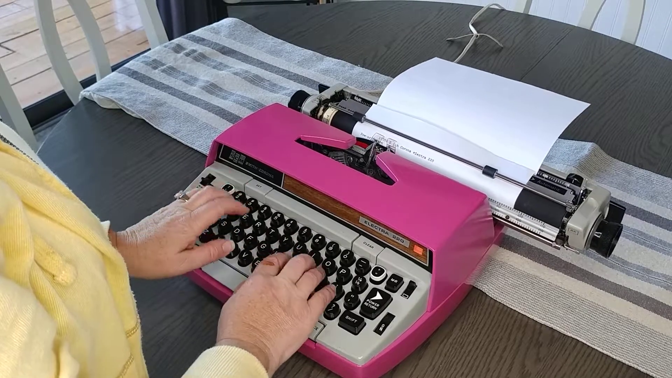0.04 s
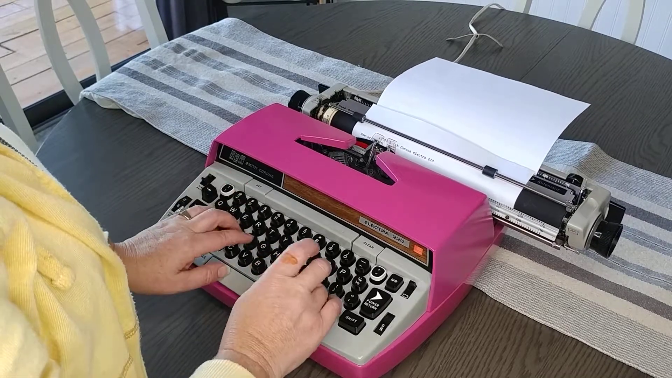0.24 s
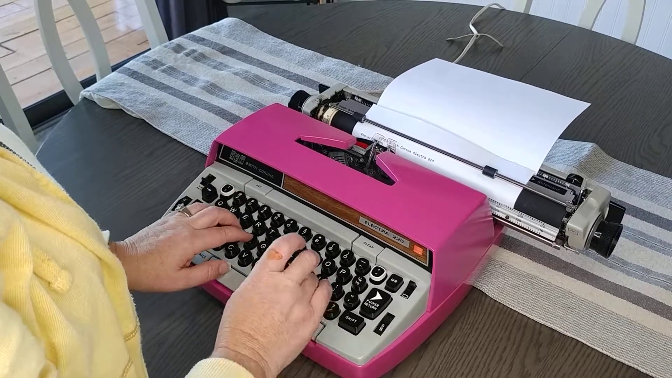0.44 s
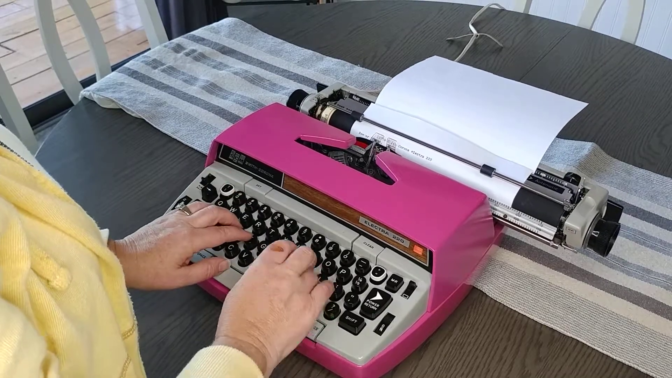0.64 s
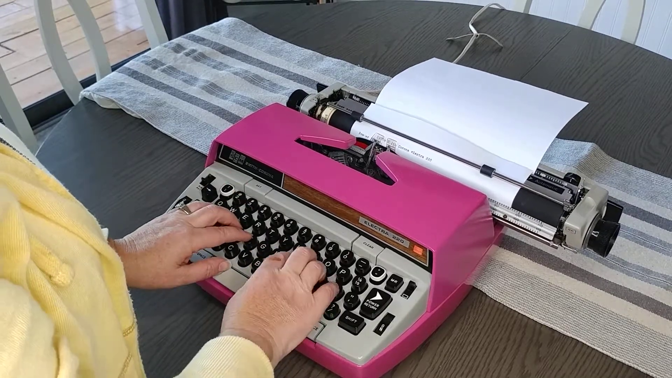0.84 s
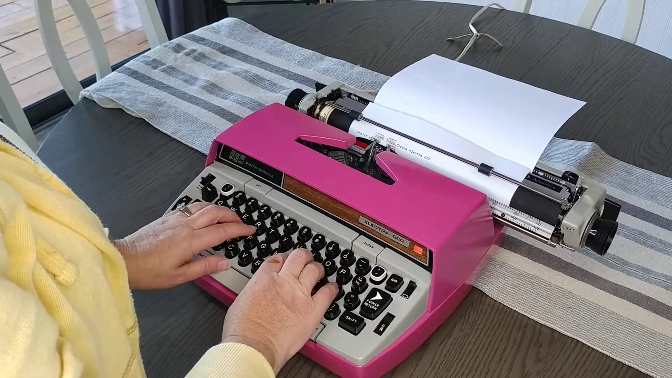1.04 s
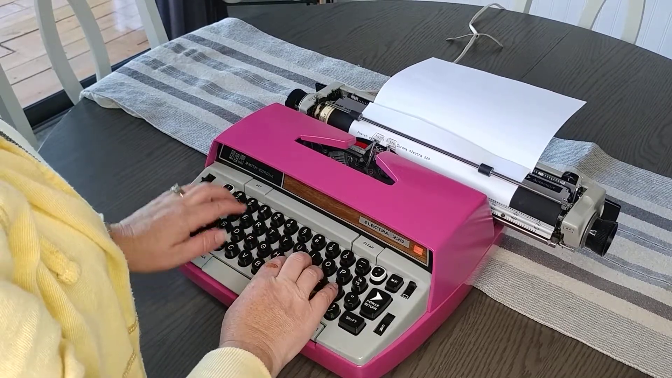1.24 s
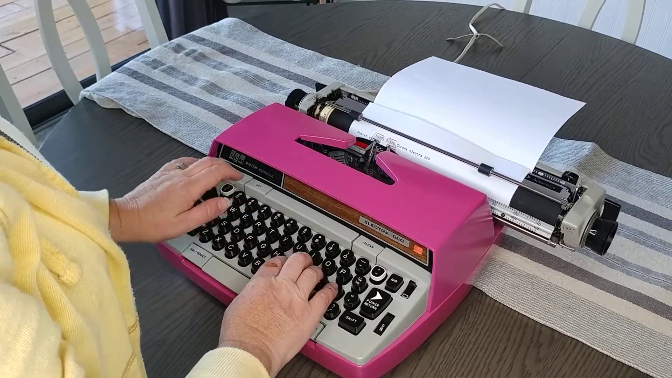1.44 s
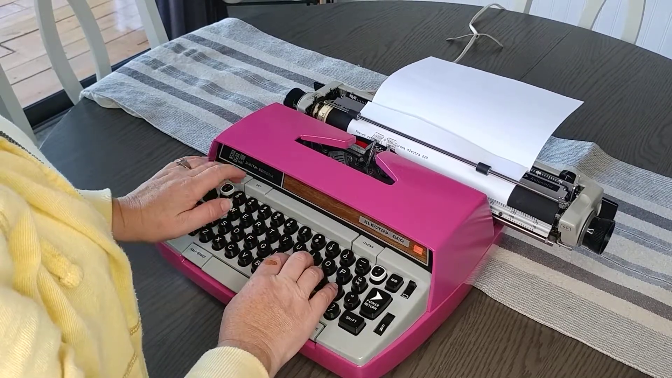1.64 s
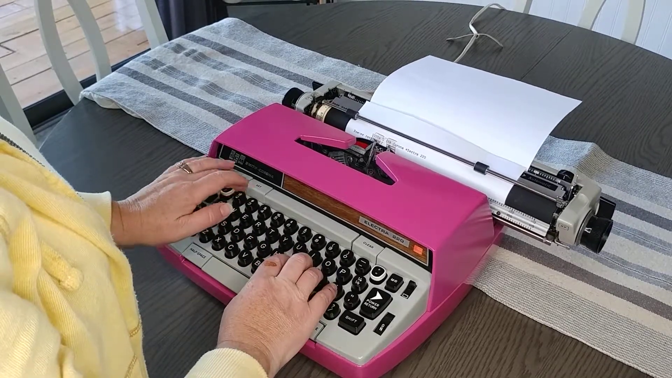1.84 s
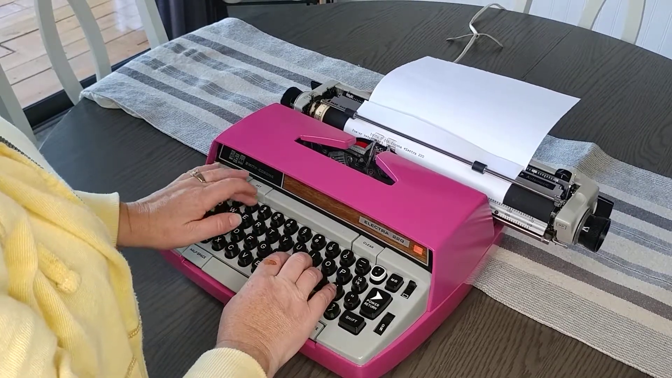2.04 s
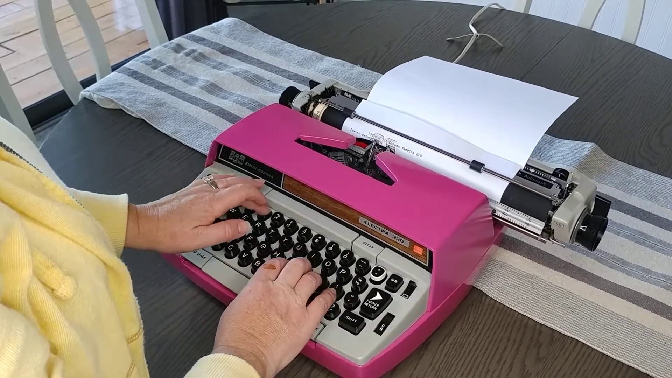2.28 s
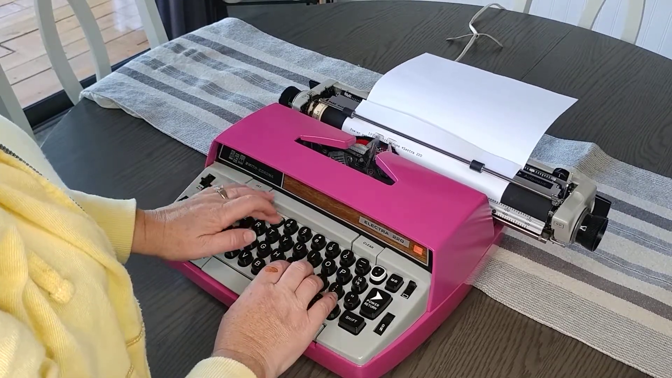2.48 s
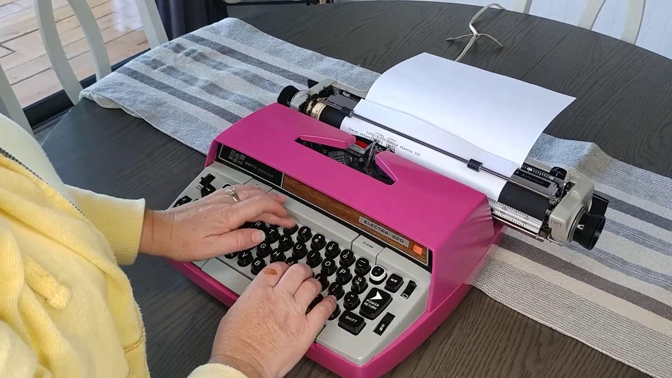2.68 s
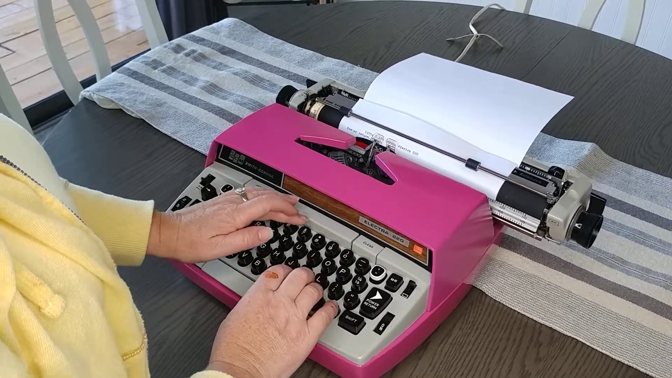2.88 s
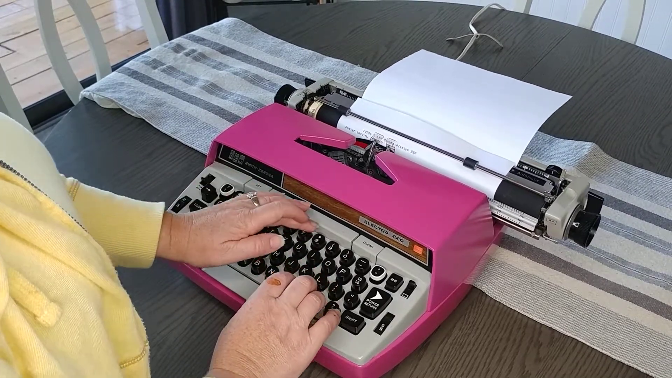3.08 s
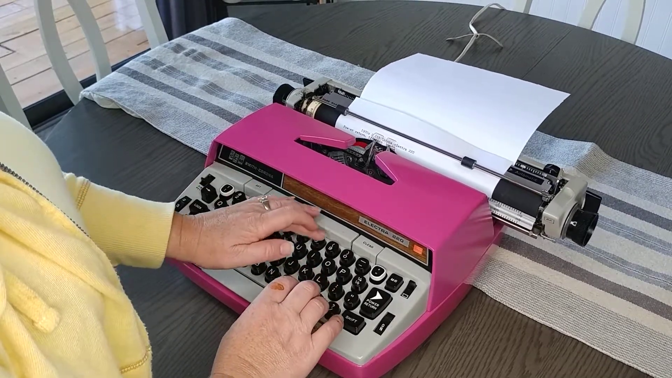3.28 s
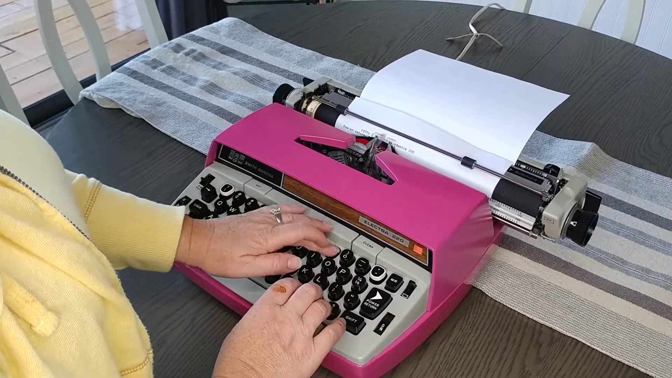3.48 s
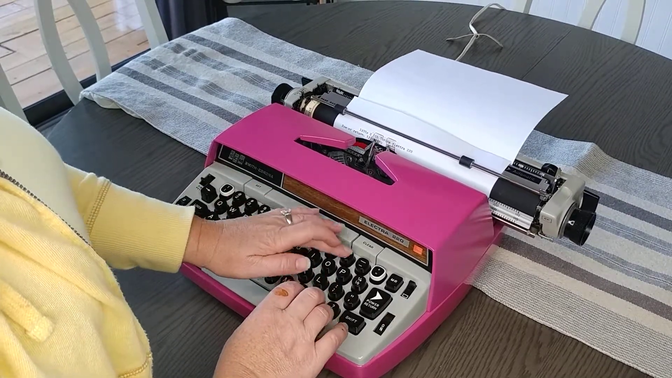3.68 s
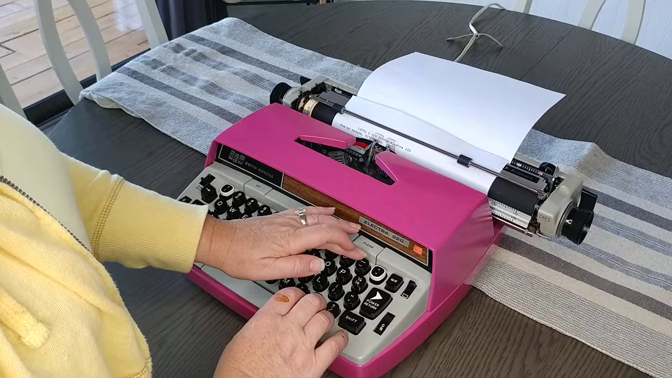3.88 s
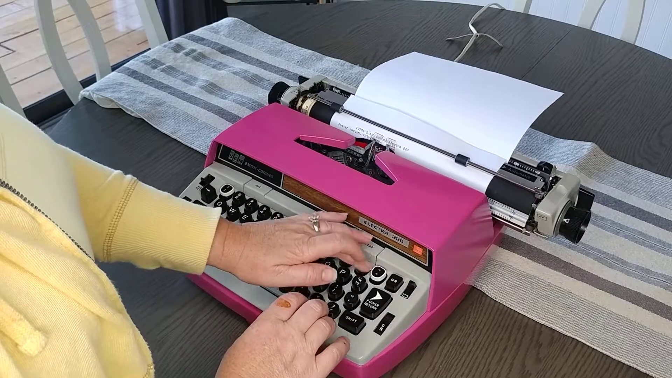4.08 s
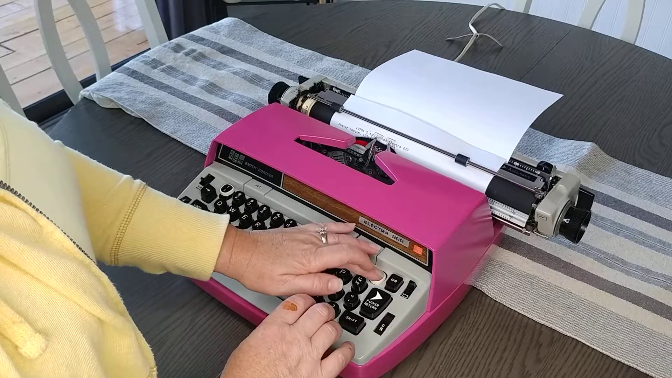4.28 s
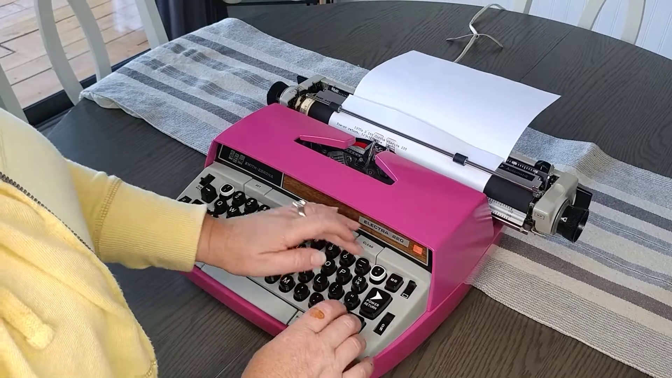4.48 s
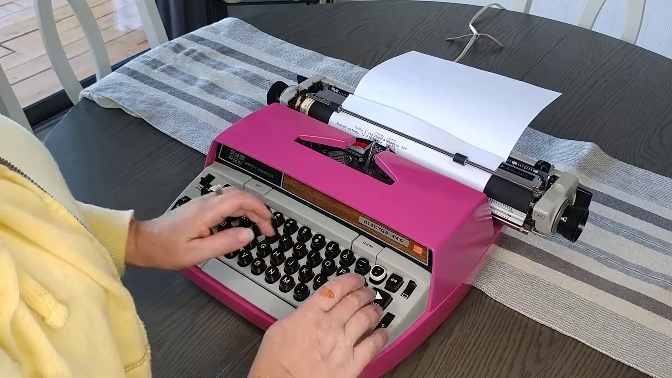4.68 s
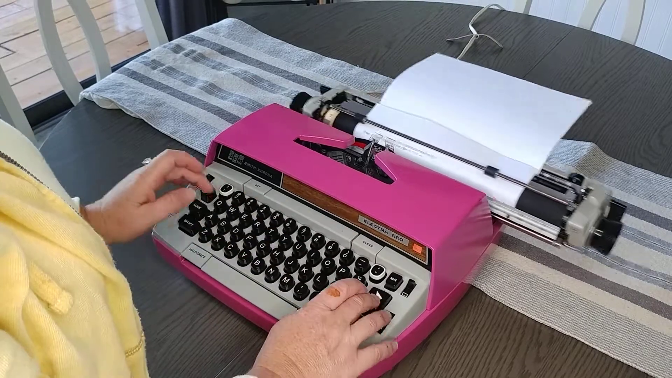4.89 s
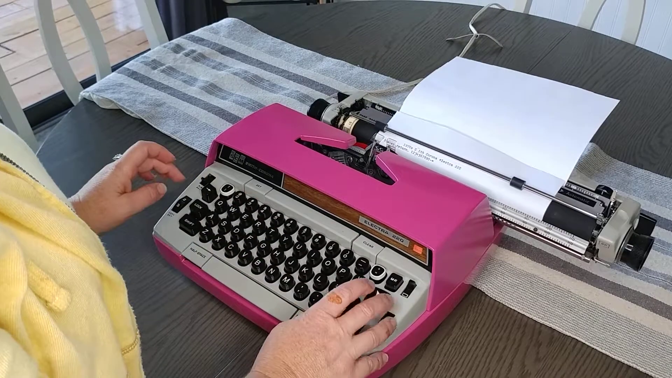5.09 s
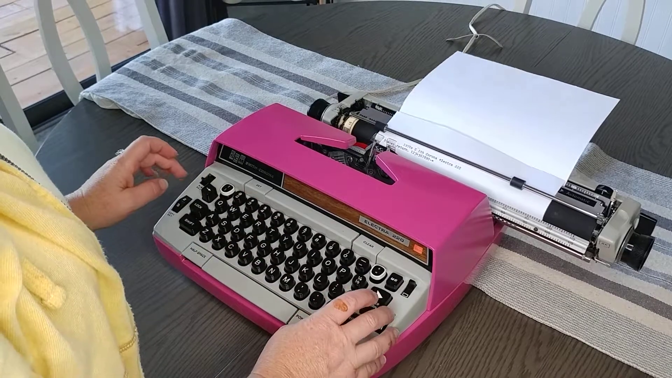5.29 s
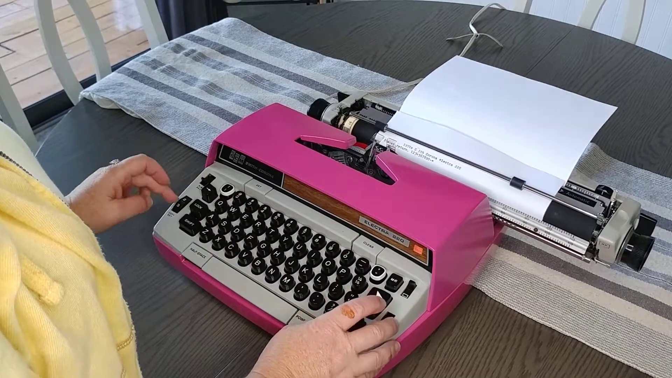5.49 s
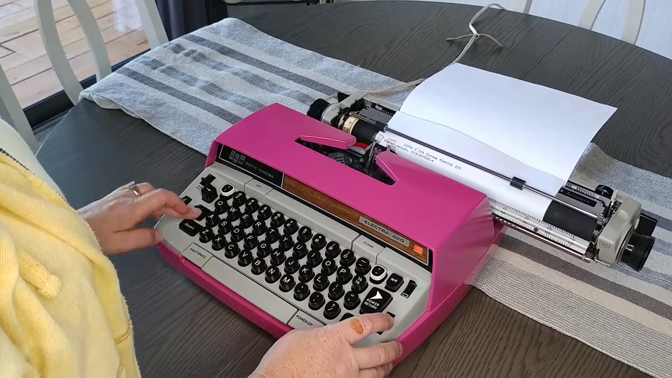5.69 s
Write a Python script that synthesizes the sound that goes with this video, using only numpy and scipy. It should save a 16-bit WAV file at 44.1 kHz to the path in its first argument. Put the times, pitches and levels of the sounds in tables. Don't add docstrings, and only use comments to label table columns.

```python
import sys
import numpy as np
from scipy import signal
from scipy.fft import rfft, irfft, next_fast_len
from scipy.io import wavfile
from scipy.ndimage import uniform_filter1d, map_coordinates

SR = 44100
rng = np.random.default_rng(int(sys.argv[2]) if len(sys.argv) > 2 else 0)


def store_wav(level_fs):
    pcm = np.round(np.clip(np.atleast_2d(level_fs), -1, 1) * 32767)
    wavfile.write(sys.argv[1], SR, pcm.T.astype(np.int16))


def linear_from_db(decibels):
    return 10 ** (np.asarray(decibels, float) / 20)


N = 252693
LEAD = SR // 4
M = N + LEAD
HOP = 64


def unit(x):
    return x / np.sqrt(np.mean(x ** 2) + 1e-20)


def along(points, hz):
    f, v = np.transpose(points)
    return np.interp(np.log(hz + 1), np.log(f + 1), v)


def wobble(rate):
    return map_coordinates(rng.standard_normal(int(M * rate / SR) + 4), [np.arange(M) * rate / SR])


def filtered(x, response):
    m = next_fast_len(x.shape[-1] + 8192)
    return irfft(rfft(x, m) * response(np.fft.rfftfreq(m, 1 / SR)), m)[..., :x.shape[-1]]


def add(track, s, sound):
    part = track[round(s * SR) + LEAD:][:len(sound)]
    part += sound[:len(part)]


def contacts(rows, rise):
    power, t = np.zeros(M), np.arange(SR // 8) / SR
    for s, db, t60 in rows:
        envelope = linear_from_db(db - 60 * t / abs(t60)) * (1 - np.exp(-t / abs(rise * t60)))
        add(power, s, envelope ** 2)
    return power


def following(pattern, blows):
    chance = rng.standard_normal((len(blows), len(pattern), 2))
    rows = []
    for (s, blow_db), row in zip(blows, chance):
        for (delay, db, t60), (u, v) in zip(pattern, row):
            rows.append((s + delay + .03 * delay * u, blow_db + db + 1.98 * v, t60))
    return rows


def colour(spectrum):
    grid = np.fft.rfftfreq(2048, 1 / SR)
    cep = irfft(np.log(linear_from_db(along(spectrum, grid)) + 1e-5))
    cep[1:1024] *= 2
    cep[1025:] = 0
    gain = np.exp(rfft(cep))
    gain /= np.sqrt(np.mean(np.abs(gain) ** 2))
    return lambda hz: np.interp(hz, grid, gain.real) + 1j * np.interp(hz, grid, gain.imag)


def basket(spectrum):
    dip_hz, dip_width_hz, dip_depth = 10570, 300, 0.96
    plain = colour(spectrum)
    return lambda hz: plain(hz) * (1 - dip_depth * np.exp(-((hz - dip_hz) / dip_width_hz) ** 2))


def resonances(modes, f):
    return sum((-1) ** k * linear_from_db(db) * 1j * f * w / (c * c - f * f + 1j * f * w)
               for k, (c, w, db) in enumerate(modes))


# frequency in Hz, likeness from 0 to 1.
LIKENESS = [(100, 0.95), (250, 0.93), (500, 0.72), (1000, 0.15), (2000, 0.054), (12000, 0.022)]


def paired(pair):
    turn = lambda hz: np.arccos(np.clip(along(LIKENESS, hz), -1, 1)) / 2
    mid_side = lambda hz: np.sqrt(2) * np.array([np.cos(turn(hz)), np.sin(turn(hz))])
    mid, side = filtered(pair, mid_side) / np.sqrt(2)
    return np.array([mid + side, mid - side])


# frequency in Hz, level in dB rms.
HUM_LINES = [(29.7, -60.5), (59.3, -55.5), (119.8, -51.5), (183, -61), (240, -67), (527, -74)]
# frequency in Hz, level in dB per Hz.
RUMBLE_AIR = [(12, -25.5), (22, -4.5), (45, -10), (70, -9), (100, -20), (200, -20), (300, -28.5),
              (500, -31.5), (800, -37), (1400, -48), (2500, -53.5), (5000, -57.5), (10000, -60),
              (16000, -63.5)]


def motor():
    idle_db, swell_db, recover_s = 1, 7.5, 0.22
    t = np.arange(M) / SR
    since = t[:, None] - LEAD / SR - [row[0] for row in BLOWS + TABLE_PUSHES]
    drawn = (np.exp(-np.abs(since) / recover_s) * (since > 0)).sum(axis=1)
    load = linear_from_db(idle_db + swell_db * np.tanh(drawn))
    lines = np.zeros(M)
    for hz, db in HUM_LINES:
        level = np.sqrt(2) * linear_from_db(db + 0.38 * wobble(28.0))
        lines += level * np.sin(2 * np.pi * hz * t + 0.31 * wobble(4.4))
    noise = paired(rng.standard_normal((2, M)))
    air = unit(filtered(noise, lambda hz: linear_from_db(along(RUMBLE_AIR, hz))))
    return load * lines + load ** .6 * linear_from_db(-47 + 0.56 * wobble(5.05)) * air


# start in seconds, force in dB, spring brightness in dB, cam level in dB.
BLOWS = [(-.12, -7, -1.5, -18), (0.654, -14.5, -8, -32.5), (1.6127, -11.5, 3.3, -35.5),
         (1.8262, -8.5, 2.5, -25.5), (2.0835, -9.5, 2.5, -32.5), (2.3294, -9.5, 2.5, -30),
         (2.5741, -9, 1.5, -31), (2.832, -7, 2.2, -29), (3.0778, -7.5, 1.1, -31), (3.3217, -7, 1.5, -32),
         (3.5812, -8, 0.5, -30.5), (3.855, -12, 2.4, -31), (4.1174, -14, -3, -29),
         (4.3983, -11, -2.5, -32.5)]
# frequency in Hz, level in dB per Hz.
SLUG_COLOUR = [(700, -23.5), (2200, -14), (4000, -6.5), (6500, -2.5), (8800, -2), (10500, -10.5),
               (15500, -16.5), (16400, -47)]


def slug_blows():
    return [(s, 1.54 + 0.14 * bright) for s, _, bright, _ in BLOWS]


def platen_cracks():
    guide_s = .0009
    cracks = [(s + late, db + 1.0, .004) for s, db in slug_blows() for late in (0, guide_s)]
    return [(contacts(cracks, rise=0.056), basket(SLUG_COLOUR), .6, -3, 1.02)]


# delay in seconds, level in dB, length t60 in seconds.
BAR_SWING = [(-.020, -28.5, 0.082), (-.006, -21, .04), (.0015, -16, .04)]
# delay in seconds, level in dB, length t60 in seconds.
CARRIAGE_ESCAPE = [(.0085, -11, .012), (.0108, 2, 0.01), (.0128, 7.5, 0.018), (.016, 3, 0.01),
                   (.022, 3, .008), (.028, -4, 0.006), (.035, -14, .01), (.041, -8, .008),
                   (.052, -5, 0.034), (.065, -5.5, 0.008)]
# frequency in Hz, level in dB per Hz.
THIN_STEEL = [(710, -22), (1200, -24), (1700, -7.5), (1860, -17.5), (2140, -11.5), (2780, -7), (4070, -8.5),
              (5970, 1), (7340, -8), (8750, 1), (9860, -9), (10800, -26), (11600, -18.5), (15100, -17),
              (16300, -49.5)]


def bars_and_escapement():
    levers = following(BAR_SWING, slug_blows()) + following(CARRIAGE_ESCAPE, [b[:2] for b in BLOWS])
    steel, thin = contacts(levers, rise=0.037), basket(THIN_STEEL)
    starts, bright_db = np.transpose([(s - .03, bright) for s, _, bright, _ in BLOWS])
    stroke = np.searchsorted(starts, (np.arange(M) - LEAD) / SR).clip(1) - 1
    springs = steel * linear_from_db(bright_db[stroke]) ** 2
    upper = lambda hz: 1 / (1 + (7300 / (hz + 1)) ** 12)
    return [(steel, lambda hz: thin(hz) * np.sqrt(1 - upper(hz)), 4, 2.5, 1.02),
            (springs, lambda hz: thin(hz) * np.sqrt(upper(hz)), 4, 2.5, 1.02)]


# frequency in Hz, level in dB, t60 in seconds, delay in seconds.
TABLE_MODES = [(30.1, -1.5, 0.43, .036), (54.4, 3, 0.19, 0.0512), (88, -9, 0.21, .042),
               (139, -8, 0.19, .03), (184.4, -10.5, .12, .015)]
# start in seconds, level in dB.
TABLE_PUSHES = [
    (1.04, -28),
    (1.07, -30.5),
    (4.856, -13),
    (4.888, -23),
    (5.062, -19),
]


def table_top():
    out, t = np.zeros(M), np.arange(SR // 2) / SR
    pushes = [(b[0], -22) for b in BLOWS] + TABLE_PUSHES
    swell = 1 - np.exp(-t / 0.015)
    for (s, push_db), scatter in zip(pushes, rng.standard_normal((len(pushes), len(TABLE_MODES)))):
        for (hz, db, t60, delay), u in zip(TABLE_MODES, scatter):
            decay = linear_from_db(push_db + db + u - 60 * t / t60)
            add(out, s + delay, decay * np.sin(2 * np.pi * hz * t) * swell)
    return out


# start in seconds, bright level in dB, dull level in dB.
LONE_CLICKS = [
    (0.383, -53.5, -68),
    (0.4106, -73, -68),
    (0.598, -36, -53.5),
    (0.9724, -45, -70),
    (1.5158, -69, -67),
    (1.566, -47, -59),
    (5.7205, -26, -50.5),
]
# frequency in Hz, level in dB per Hz.
LEVER_COLOUR = [(700, -28.5), (1500, -9.5), (3000, -13), (6000, -6), (8500, -3), (10600, -8), (14000, -7.5),
                (16300, -36)]
KEY_T60 = .045


def key_touches():
    cam_lead_s, cam_steel_db = 0.036, 11
    return LONE_CLICKS + [(s - cam_lead_s, cam + cam_steel_db, cam) for s, _, _, cam in BLOWS]


def cam_trips():
    clicks = [(s, bright - 4, KEY_T60) for s, bright, _ in key_touches()]
    return [(contacts(clicks, rise=0.11), colour(LEVER_COLOUR), 4, -1.5, .9)]


# delay in seconds, level in dB, length t60 in seconds.
BAR_RETURN = [(0, 5, 0.0046), (.013, 17, 0.0091), (.032, 11.5, 0.017), (.050, 12, 0.016), (.063, -5, 0.033)]
# frequency in Hz, width in Hz, level in dB.
CASE_MODES = [(127, 45, -2), (195, 43, -4.5), (284, 19, -18), (387, 96, -2.5), (518, 38, 3), (820, 49.7, 7),
              (1160, 110, 2.5), (1510, 190, -3), (1710, 140, 0), (2490, 1200, -5)]


def case(f):
    return 3 * resonances(CASE_MODES, f)


def case_knocks():
    drops = following(BAR_RETURN, [(b[0], -25) for b in BLOWS])
    keys = [(s, dull + 7, 3.4 * KEY_T60) for s, _, dull in key_touches()]
    return [(contacts(drops + keys, rise=0.059), case, 3, -.5, 1.02)]


# start in seconds, steel level in dB, case knock in dB,
# frame ring in dB, bounce gap in seconds.
CLACK_ROWS = [
    (1.032, -33, -33, -50, .012),
    (1.088, -31, -30.5, -36.5, 0.01),
    (4.832, -31, -45, -63, .006),
    (4.8457, -18.5, -31, -35, .012),
    (4.853, -5.5, -17.5, -13, 0.017),
    (4.905, -23, -19, -40, 0.015),
    (5.048, -12.5, -24, -31.5, 0.016),
    (5.056, -12, -17, -24.5, .007),
    (5.0902, -9.5, -17, -20.5, .009),
]
# frequency in Hz, level in dB per Hz.
HEAVY_STEEL = [(710, -44.5), (1200, -13), (1410, -11.5), (1650, -14), (3380, -12.5), (4400, -10.5),
               (6800, -14.5), (8650, -7), (10600, -17.5), (14400, -21.5), (16300, -36.5)]


def bounces():
    steel_loss_db, case_loss_db, ring_loss_db = 5.5, 3.5, 17.5
    return [(s + k * gap, steel - k * steel_loss_db, knock - k * case_loss_db, ring - k * ring_loss_db)
            for s, steel, knock, ring, gap in CLACK_ROWS for k in range(3)]


def carriage_clacks():
    clack_t60 = 0.039
    heavy = [(s, steel + 3, clack_t60) for s, steel, _, _ in bounces()]
    clunks = [(s, knock + 9, 1.1 * clack_t60) for s, _, knock, _ in bounces()]
    return [(contacts(heavy, rise=0.025), colour(HEAVY_STEEL), 1.2, -4, .8),
            (contacts(clunks, rise=0.043), lambda hz: case(hz) / (1 + 1j * hz / 2500), 3, -1.5, .98)]


# frequency in Hz, level in dB, t60 in seconds.
FRAME_MODES = [(827, -8.5, 0.017), (1240, 1, 0.013), (1437, 8, 0.055), (1428, -3, .05), (1510, 1.5, .05),
               (4500, -18.5, .03), (9000, -8.5, 0.035), (9550, -16, .04)]


def carriage_frame():
    out, t = np.zeros(M), np.arange(SR // 5) / SR
    hits = bounces()
    for row, scatter in zip(hits, rng.standard_normal((len(hits), len(FRAME_MODES)))):
        ring = np.zeros(len(t))
        for (hz, db, t60), u in zip(FRAME_MODES, scatter):
            ring += linear_from_db(db + 0.83 * u - 60 * t / t60) * np.sin(2 * np.pi * hz * t)
        add(out, row[0], linear_from_db(row[-1]) * ring * (1 - np.exp(-t / 0.0011)))
    return out


def direct(parts, ring):
    out, links = np.array([ring, ring]), wobble(700)
    for power, response, chatter_db, _, _ in parts:
        a, b = rng.standard_normal((2, M))
        rattle = np.sqrt(power) * unit(linear_from_db(chatter_db * links))
        out += filtered(rattle * [a, 0.4 * a + 0.75 * b], response)
    apart = filtered(out[1] - out[0], lambda hz: 1 / (1 + (hz / 500) ** 4))
    return np.array([out[0] + apart / 2, np.roll(out[1] - apart / 2, 6)])


# frequency in Hz, t60 in seconds.
ROOM_T60 = [(150, 0.51), (530, 0.46), (1400, 0.44), (3700, 0.46), (9700, 0.38), (15000, 0.22)]


def lingering(power, hz, length):
    keep = linear_from_db(-60 * HOP / SR / (length * along(ROOM_T60, hz))) ** 2
    gather = np.exp(-HOP / SR / 0.00033)
    far = round(.008 * SR / HOP)
    return np.abs([signal.lfilter([0] * far + [(1 - k) * (1 - gather)],
                                  np.convolve([1, -k], [1, -gather]), band)
                   for k, band in zip(keep, power)])


def room(parts, ring):
    frames = dict(nperseg=4 * HOP, noverlap=3 * HOP)
    hz, t, z = signal.stft(rng.standard_normal((2, M)), SR, **frames)
    ringing = np.abs(signal.stft(ring, SR, **frames)[2]) ** 2 / np.mean(np.abs(z) ** 2)
    spread = linear_from_db(-19.5) ** 2 * lingering(ringing, hz, .7)
    for power, response, _, wet_db, length in parts:
        steps = np.interp(t * SR, np.arange(M), uniform_filter1d(power, HOP))
        bands = np.abs(response(hz))[:, None] ** 2 * steps
        spread += linear_from_db(wet_db) ** 2 * lingering(bands, hz, length)
    loudness, faint = spread[hz > 700].mean(0), linear_from_db(-48.5) ** 2
    overall = (loudness / (loudness + faint)) ** 0.38
    treble = (spread / (spread + linear_from_db(-61) ** 2)) ** np.where(hz > 1500, .4, 0)[:, None]
    spread *= overall * treble
    return paired(signal.istft(z * np.sqrt(spread), SR, **frames)[1][:, :M])


# frequency in Hz, left minus right in dB.
LEFT_LEAN = [(60, -5.5), (180, 2.5), (550, 0), (1650, -0.5), (4970, 1), (15000, 1)]
# frequency in Hz, width in Hz, level in dB.
IDLE_BARS = [(2770, 40, -2), (5300, 45, -1), (5750, 28, -2), (5880, 50, 0.5), (6240, 53, -0.5),
             (6520, 27, -1), (6600, 13, -8), (7980, 40, -1), (8000, 48, 3), (8460, 37, -1),
             (8490, 45, -1.5), (9140, 55, -2.5), (9150, 52, -4)]


def scene():
    parts = platen_cracks() + bars_and_escapement() + cam_trips() + case_knocks() + carriage_clacks()
    ring = carriage_frame()
    machine = direct(parts, ring) + room(parts, ring)
    lean = lambda hz: linear_from_db(along(LEFT_LEAN, hz) * [[.5], [-.5]])
    machine = filtered(machine, lambda hz: lean(hz) * (0.94 + resonances(IDLE_BARS, hz)))
    return (machine + table_top() * linear_from_db([[.3], [-.3]]) + motor())[:, LEAD:]


def band_limit(x):
    return signal.sosfilt(signal.butter(12, 16440, fs=SR, output="sos"), x)


def record(dry):
    x = dry / (1 + np.abs(dry / .86) ** 8) ** (1 / 8)
    x = filtered(x, lambda hz: hz < 16400)
    return band_limit(x)


dry = scene()
out = record(dry)
store_wav(out)
```